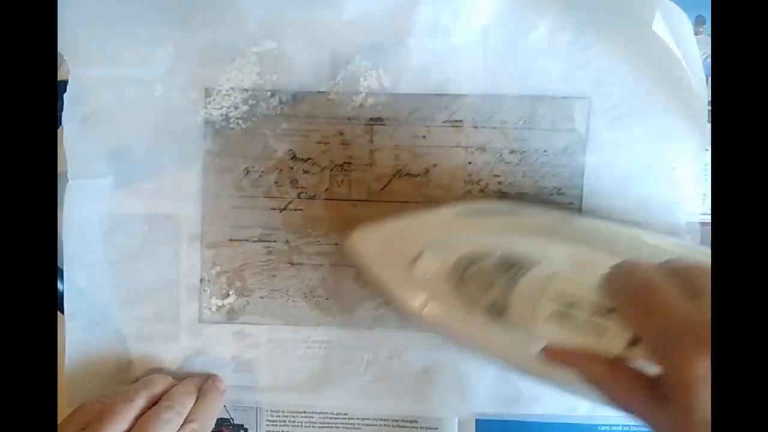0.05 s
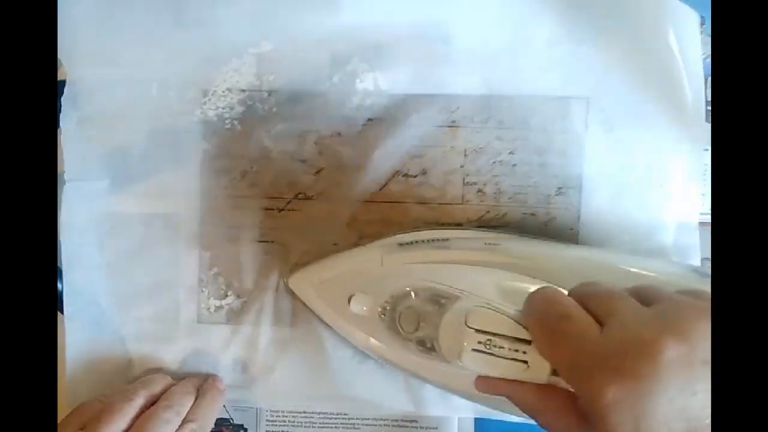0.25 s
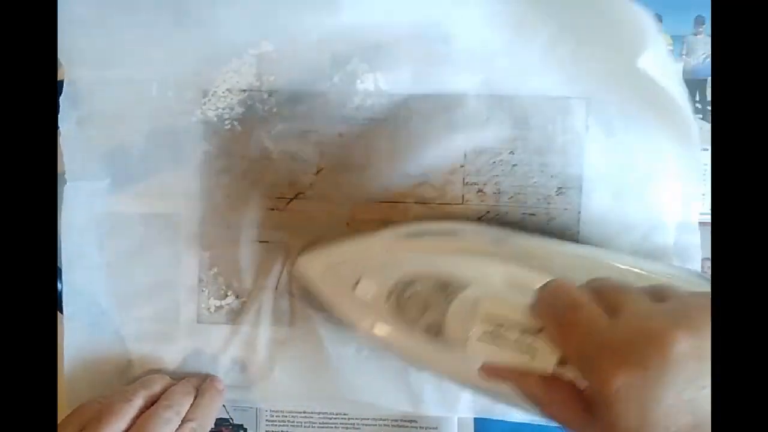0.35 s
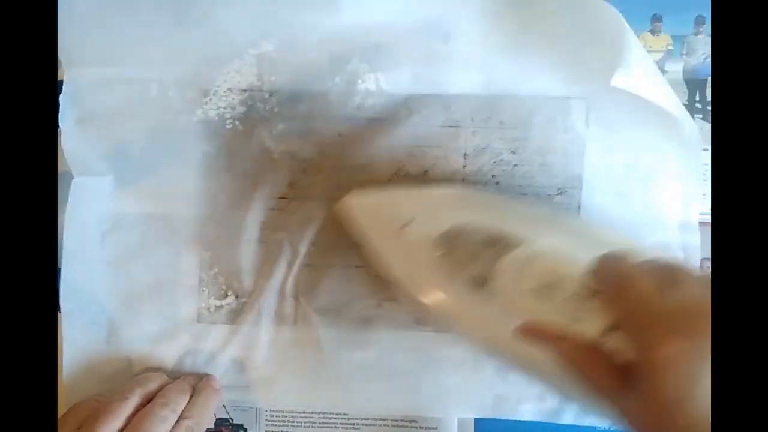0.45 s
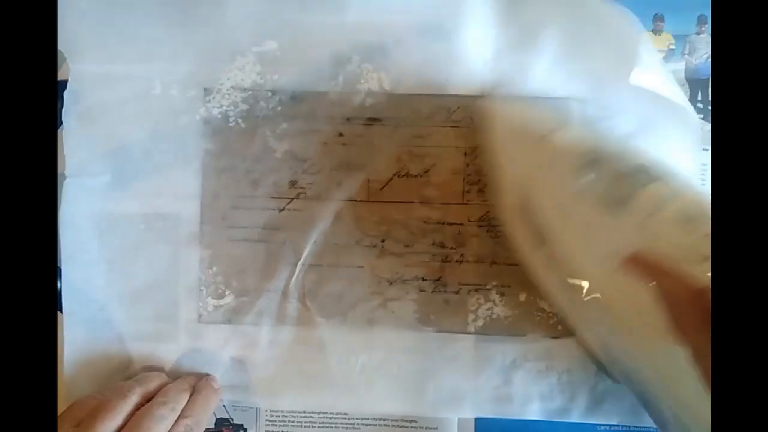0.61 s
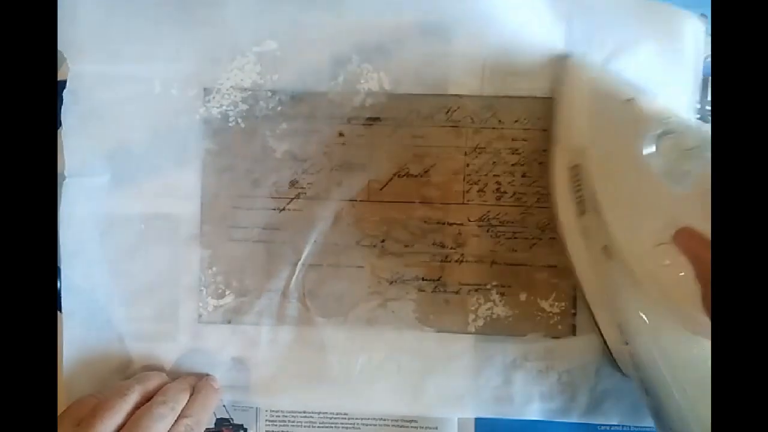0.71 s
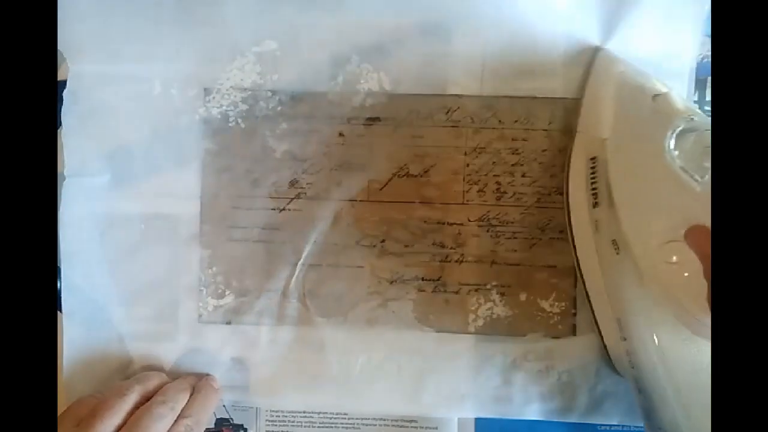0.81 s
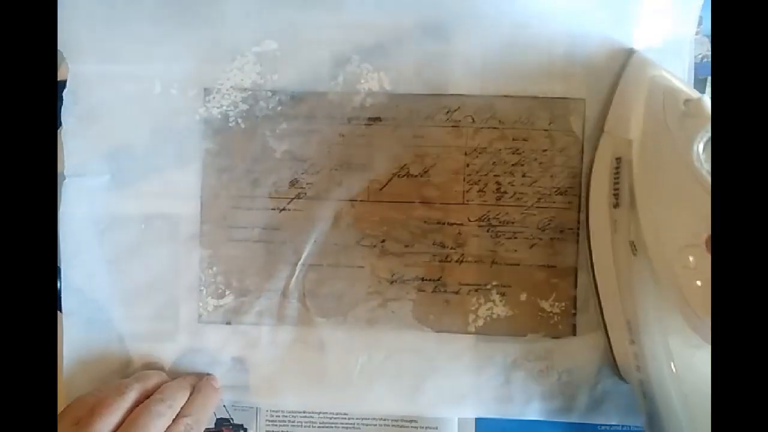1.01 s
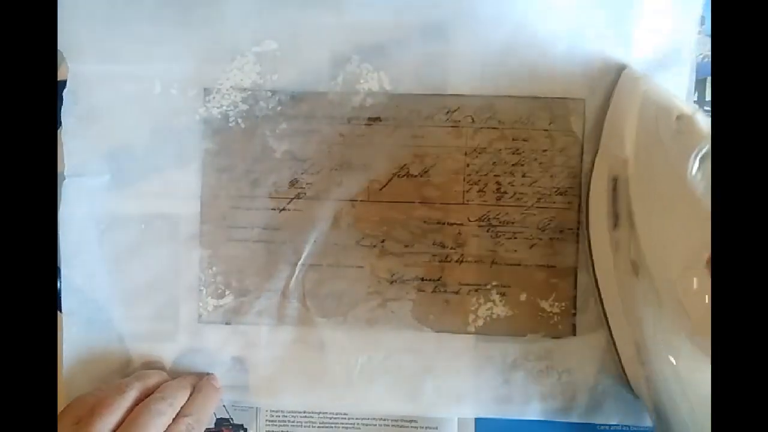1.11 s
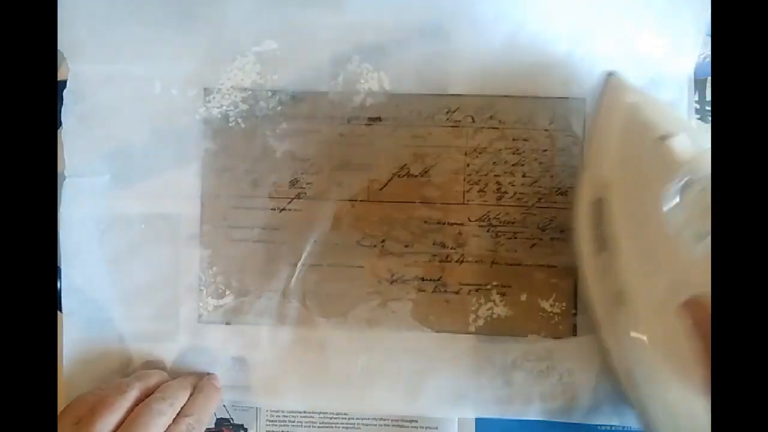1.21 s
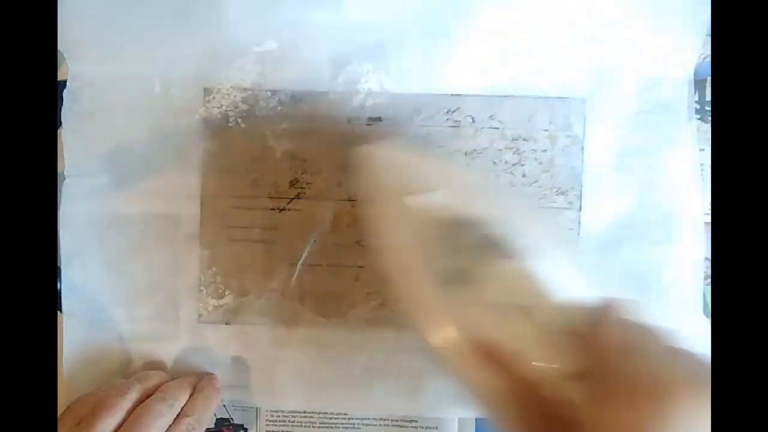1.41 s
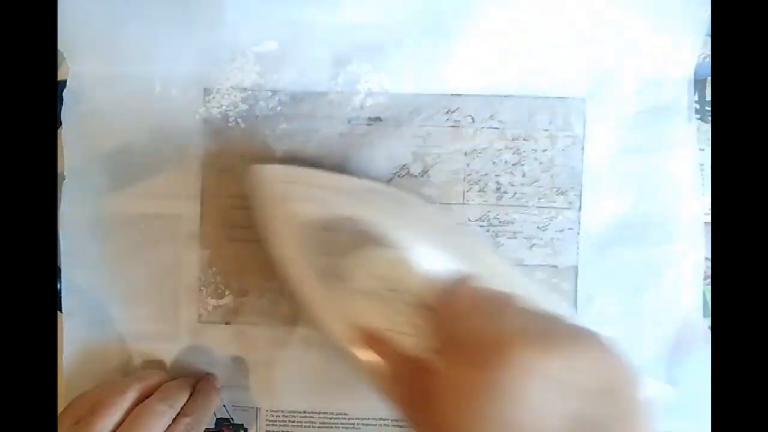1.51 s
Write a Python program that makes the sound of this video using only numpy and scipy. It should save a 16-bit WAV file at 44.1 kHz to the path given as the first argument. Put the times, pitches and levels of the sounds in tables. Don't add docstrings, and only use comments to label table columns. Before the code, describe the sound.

One brisk iron stroke rasps across thin crackly paper, crinkling and snapping, then fading to quiet

```python
import sys
import numpy as np
from scipy import signal
from scipy.fft import rfft, irfft
from scipy.io import wavfile

SR = 44100
rng = np.random.default_rng(int(sys.argv[2]) if len(sys.argv) > 2 else 0)


def pcm_store(signal):
    levels = np.round(np.clip(np.atleast_2d(signal), -1, 1) * 32767)
    wavfile.write(sys.argv[1], SR, levels.astype(np.int16).T)


def field_ratio(decibels):
    return 10 ** (np.asarray(decibels, dtype=float) / 20)


N = 68355

# (time [s], rub level [dB])
STROKE_EFFORT = [(0, -52.5), (.12, -51), (0.206, -46), (0.236, -38), (.275, -37.5), (.33, -28.5),
                 (.43, -30.5), (.49, -29), (0.551, -25.5), (0.648, -33), (0.748, -29.5), (0.879, -39.5),
                 (1.03, -54), (1.12, -60.5), (1.32, -67), (1.42, -53.5), (1.515, -55.5), (1.54, -45)]
# (time [s], length [s], level [dB],
# pitch [Hz], treble re level [dB])
SHEET_CRINKLES = [(.2268, .006, -36, 3800, -20), (.2405, .009, -29, 1800, -16),
                  (.2565, .002, -32, 4500, -22), (.273, .003, -34, 3700, -20),
                  (.3012, .011, -29.5, 2400, -16), (.3825, .003, -26, 3600, -17),
                  (.398, .010, -18, 3500, -15), (.4105, .006, -28, 3500, -13),
                  (.449, .004, -29, 1550, -20), (.474, .004, -26, 3340, -18),
                  (.4995, .004, -24, 2200, -17), (.509, .004, -19, 3200, -17),
                  (.5195, .002, -22, 4000, -13), (.5275, .003, -22, 3900, -20),
                 (.5358, .002, -22, 3800, -19), (.5565, .002, -24, 4000, -16), (.596, .003, -27, 3400, -20),
                 (.662, .016, -25, 3000, -20), (.717, .008, -29, 1800, -16), (.757, .004, -31, 3000, -12),
                 (.843, .008, -33, 3900, -15), (.989, .006, -48, 2500, -22), (1.407, .005, -56, 4500, -4),
                 (1.5228, .010, -41, 4700, -16)]
# (time [s], peak [dB], pitch [Hz], treble [dB])
CREASE_SNAPS = [(.0712, -41, 4300, -26), (.2455, -21, 2000, -30), (.257, -22, 4500, -30),
                (.3017, -18, 2600, -16), (.312, -20, 3500, -26), (.3835, -16, 3600, -26),
                (.3995, -13, 4500, -22), (.4055, -10, 3200, -26), (.5403, -4.5, 4600, -34),
                (.5474, -6.5, 4400, -36), (.5637, -8.5, 3400, -24), (.667, -17, 2600, -28),
                (.6785, -15, 3100, -30), (.844, -25, 3900, -22), (1.5245, -28, 4600, -22),
                (1.526, -28, 4200, -26), (1.5425, -35, 3800, -28)]
# (time [s], length [s], level [dB], pitch [Hz])
TAUT_PATCHES = [(0.057, 0.02, -56, 1507), (.01, 0.017, -58, 3170), (.15, 0.039, -61, 2490),
                (0.152, 0.038, -55.5, 2220), (0.148, 0.039, -63, 3250), (0.232, .02, -42, 1926),
                (0.35, 0.013, -43.5, 685), (0.417, 0.019, -42, 741), (0.502, 0.0044, -36, 765),
                (0.526, 0.0053, -36.5, 734), (0.56, 0.0095, -36.5, 880), (0.673, 0.01, -42, 744),
                (0.896, 0.007, -41.5, 1202), (0.97, .025, -54.5, 1217), (0.995, 0.004, -46.5, 1810),
                (1.423, 0.029, -57, 3175), (1.42, 0.077, -60, 4050), (1.527, 0.016, -50.5, 1370),
                (1.523, 0.0061, -52.5, 2060), (0.254, 0.013, -44, 1064)]
# (time [s], length [s], level [dB], pitch [Hz])
TABLE_SHUDDERS = [
    (0.037, 0.099, -65.5, 66),
    (0.754, .05, -64, 64),
    (0.853, 0.056, -62.5, 60),
    (0.954, 0.032, -60, 57.7),
    (1.19, 0.064, -66, 48),
    (1.446, 0.053, -57, 45),
    (1.526, 0.016, -51.5, 45.7),
    (1.547, 0.0099, -48, 100),
]
# (frequency [Hz], density [dB per Hz])
PAPER_SPECTRUM = [(300, -26), (600, -11), (800, -12.5), (1200, -4.5), (2000, -5), (3000, -3), (3800, -1.5),
                  (5000, -5.5)]
# (frequency [Hz], gain [dB])
MIC_PORT = [(5600, 0), (6300, -9), (7300, -22.5), (8500, -16.5), (9700, -24), (11800, -11.5),
            (13500, -18.5), (15600, -26.5)]
# (frequency [Hz], level re unit white noise [dB])
ROOM_NOISE = [(22, -47), (50, -43), (110, -47.5), (250, -50.5), (1000, -59), (3000, -64), (8000, -65),
              (13000, -66.5)]
# (frequency [Hz], cut [dB])
CLOSED_CUT = [(500, 39.5), (700, 26), (1000, 19), (2000, 17.5), (4000, 15), (9000, -19.5)]
# (frequency [Hz], margin [dB])
OPEN_MARGIN = [(1000, 8.5), (2500, 7), (4000, 5), (7000, 0)]

TIME_S = np.arange(N) / SR
PORT_DIP_HZ = 6900


def rub():
    patchy_db, catches_per_s = 1.3, 160
    airy_db_per_db, full_stroke_db = 0.18, -38.5
    stroke = np.array(STROKE_EFFORT)
    level_db = np.interp(TIME_S, stroke[:, 0], stroke[:, 1])
    effort = field_ratio(level_db + patchy_db * catches(catches_per_s))
    drag = effort * unit(colour(grit(), PAPER_SPECTRUM, MIC_PORT))
    airy_gain = field_ratio(airy_db_per_db * (full_stroke_db - level_db))
    return drag + (airy_gain - 1) * treble(drag)


def catches(rate_per_s):
    fade_s = .004
    jolts = (rng.random(N) < rate_per_s / SR) * rng.random(N)
    grip = signal.lfilter([1], [1, -np.exp(-1 / (fade_s * SR))], jolts)
    return unit(grip - grip.mean())


def grit():
    grains_per_s, scatter_db, largest_grain, tail_s = 2600, 2.5, 4.5, 0.0011
    grit_db, hiss_db = -2, 0.5
    released = rng.random(N) < grains_per_s / SR
    size = np.minimum(rng.exponential(size=N), largest_grain)
    clicks = released * field_ratio(scatter_db * size)
    sign = np.sign(rng.standard_normal(N))
    tail_level = signal.lfilter([1], [1, -np.exp(-1 / (tail_s * SR))], clicks)
    releases = clicks * sign + 0.24 * tail_level * rng.standard_normal(N)
    return field_ratio(grit_db) * unit(releases) + field_ratio(hiss_db) * rng.standard_normal(N)


def crinkles():
    rise_s, fall_s, q = .0004, .0025, 1.6
    broad_db, treble_trim_db, trim_db = 0, 3, -1
    grain = colour(grit(), PAPER_SPECTRUM, MIC_PORT)
    out = np.zeros(N)
    for time_s, length_s, level_db, pitch_hz, treble_db in SHEET_CRINKLES:
        start = int(time_s * SR)
        g = grain[start:start + SR // 20]
        age_s = TIME_S[:len(g)]
        shape = np.minimum(age_s / rise_s, 1) * np.exp(-np.maximum(age_s - length_s, 0) / fall_s)
        body = dull(unit(ring(g, pitch_hz, q)) + field_ratio(broad_db) * unit(g))
        burst = unit(shape * body) + field_ratio(treble_db + treble_trim_db) * unit(shape * treble(g))
        shape_rms = np.sqrt(np.mean(shape ** 2))
        out[start:start + len(g)] += field_ratio(level_db + trim_db) * burst * shape_rms
    return out


def snaps():
    q, treble_trim_db = 1.7, 16
    click = np.sinc(np.arange(SR // 50) - 16.3)
    out = np.zeros(N)
    for time_s, peak_db, pitch_hz, treble_db in CREASE_SNAPS:
        snap = dull(ring(click, pitch_hz, q)) + field_ratio(treble_db + treble_trim_db) * treble(click)
        snap = colour(snap, PAPER_SPECTRUM, MIC_PORT)
        start = int(time_s * SR) - np.argmax(np.abs(snap))
        snap = field_ratio(peak_db) * snap / np.abs(snap).max()
        out[start:start + len(snap)] += snap[:N - start]
    return out


def patches():
    q = 14.
    stir, out = rng.standard_normal(N), np.zeros(N)
    for time_s, length_s, level_db, pitch_hz in TAUT_PATCHES:
        sung = swell(time_s, length_s) * ring(ring(stir, pitch_hz, q), pitch_hz, q)
        out += field_ratio(level_db) * unit(sung) * np.sqrt(length_s * SR / N)
    return out


def echo(paper):
    echo_db, t60_s = -10, 0.087
    t = np.arange(SR // 8) / SR
    tail = rng.standard_normal(len(t)) * field_ratio(-60 * t / t60_s) * (t > .001)
    tail /= np.sqrt(np.sum(tail ** 2))
    return field_ratio(echo_db) * signal.fftconvolve(paper, tail)[:N]


def shudders():
    out = np.zeros(N)
    for time_s, length_s, level_db, pitch_hz in TABLE_SHUDDERS:
        tone = np.sin(2 * np.pi * pitch_hz * TIME_S)
        out += field_ratio(level_db + CLOSED_CUT[0][1]) * swell(time_s, length_s) * tone
    return out


def room():
    return colour(rng.standard_normal(N), ROOM_NOISE, CLOSED_CUT)


def curve(points, hz):
    p = np.array(points, float)
    return np.interp(np.log(np.maximum(hz, 1)), np.log(p[:, 0]), p[:, 1])


def colour(x, *shapes):
    size = 4096
    hz = np.fft.rfftfreq(size, 1 / SR)
    total_db = sum(curve(s, hz) for s in shapes)
    cepstrum = irfft(total_db * np.log(10) / 20)
    cepstrum[1:size // 2] *= 2
    cepstrum[size // 2 + 1:] = 0
    return signal.fftconvolve(x, irfft(np.exp(rfft(cepstrum))))[:len(x)]


def unit(x):
    return x / np.sqrt(np.mean(x ** 2))


def ring(x, hz, q):
    return signal.lfilter(*signal.iirpeak(hz, q, SR), x)


def treble(x):
    return signal.sosfilt(signal.butter(4, PORT_DIP_HZ, "high", fs=SR, output="sos"), x)


def dull(x):
    return signal.sosfilt(signal.butter(2, PORT_DIP_HZ, fs=SR, output="sos"), x)


def swell(time_s, length_s):
    return np.exp(-((TIME_S - time_s) / length_s) ** 2)


def scene():
    paper = rub() + crinkles() + snaps() + patches()
    return (paper + echo(paper) + room() + shudders())[None]


def top_cut(x):
    return signal.sosfilt(signal.butter(12, 15850, fs=SR, output="sos"), x)


def record(dry):
    size, hop = 512, 128
    hold_s, steepness, lowest_hz, top_hz = .025, 3.5, 620, 15800
    padded = np.pad(dry, ((0, 0), (0, size)), "reflect")
    hz, _, z = signal.stft(padded, SR, nperseg=size, noverlap=size - hop, boundary="even")
    closed = field_ratio(-curve(CLOSED_CUT, hz))[:, None]
    threshold_db = curve(ROOM_NOISE, hz) + curve(CLOSED_CUT, hz) + curve(OPEN_MARGIN, hz)
    threshold = field_ratio(2 * threshold_db)[:, None] * 1.5 / size
    keep = np.exp(-hop / SR / hold_s)
    power = np.abs(z) ** 2
    recent = signal.lfilter([1 - keep], [1, -keep], power)
    recent = np.maximum(recent, power / 6)
    opening = (hz > lowest_hz)[:, None] / (1 + (threshold / (recent + 1e-18)) ** steepness)
    gain = closed + (1 - closed) * opening
    z = z * gain * (hz < top_hz)[:, None]
    mix = signal.istft(z, SR, nperseg=size, noverlap=size - hop)[1][:, :N]
    return top_cut(mix)


dry = scene()
out = record(dry)
pcm_store(out)
```